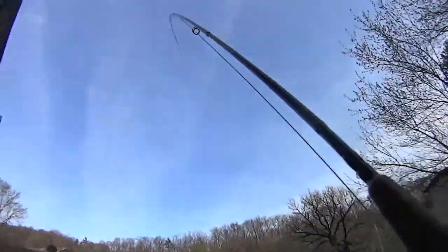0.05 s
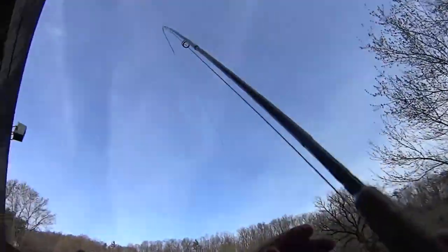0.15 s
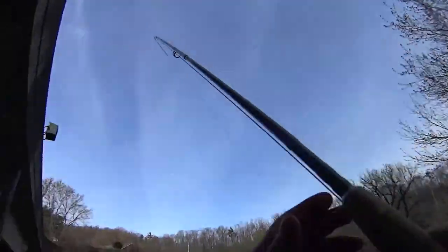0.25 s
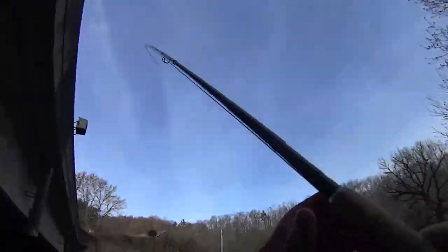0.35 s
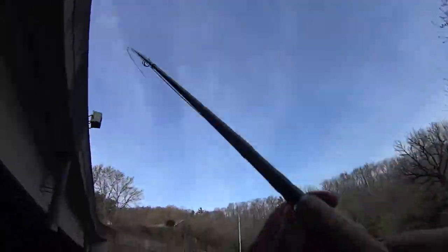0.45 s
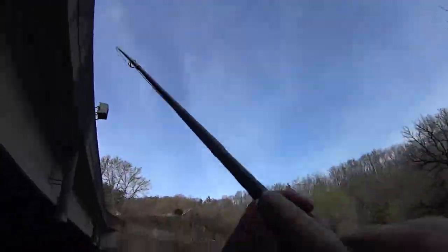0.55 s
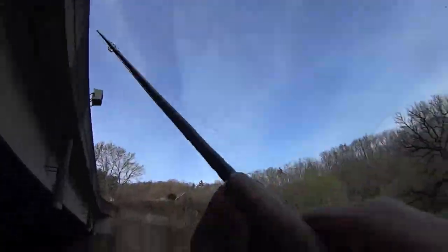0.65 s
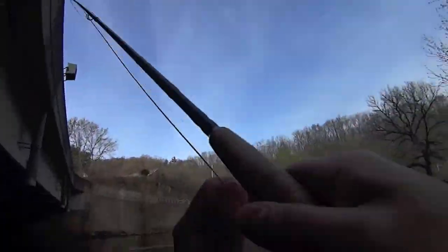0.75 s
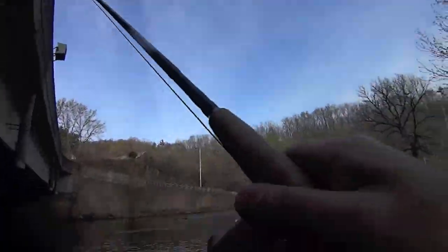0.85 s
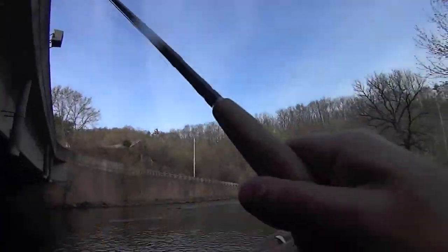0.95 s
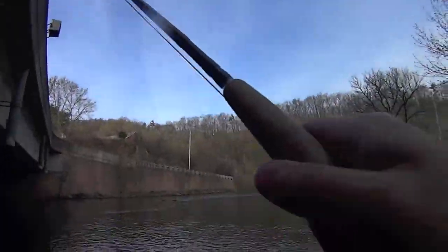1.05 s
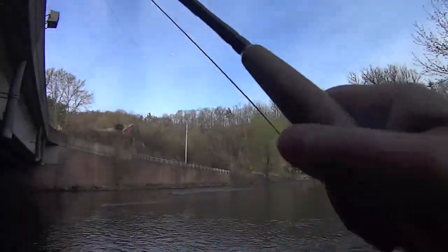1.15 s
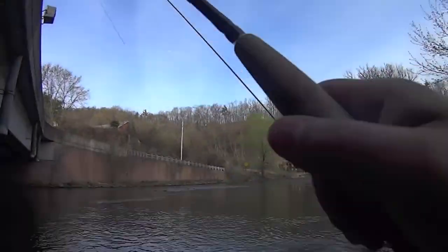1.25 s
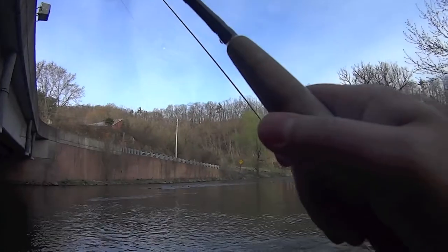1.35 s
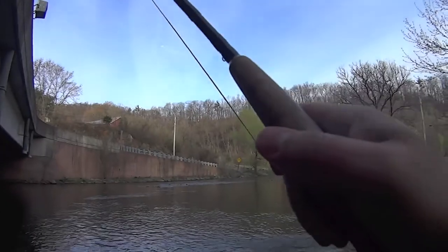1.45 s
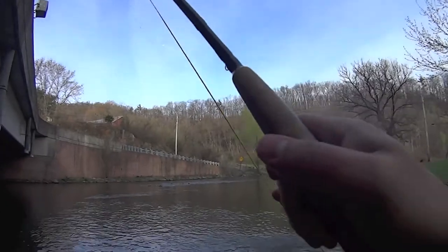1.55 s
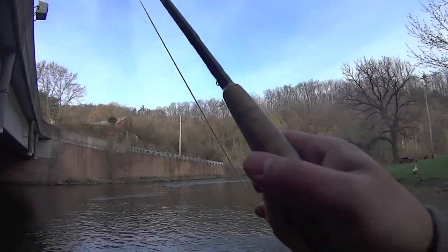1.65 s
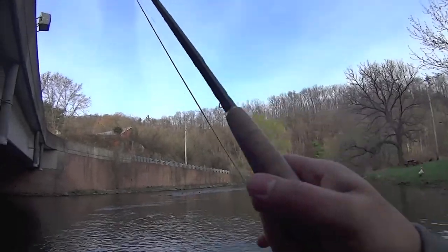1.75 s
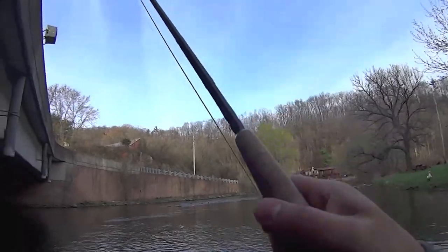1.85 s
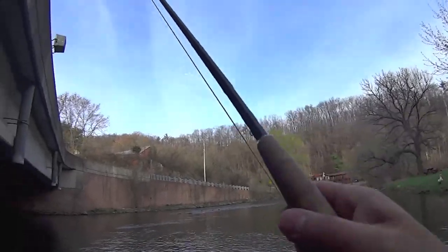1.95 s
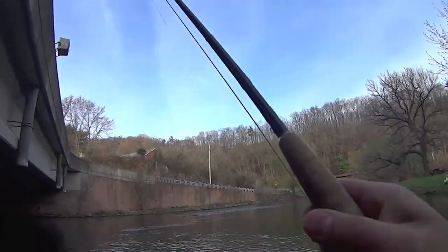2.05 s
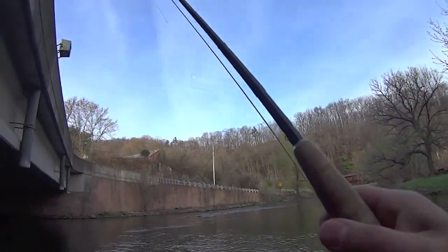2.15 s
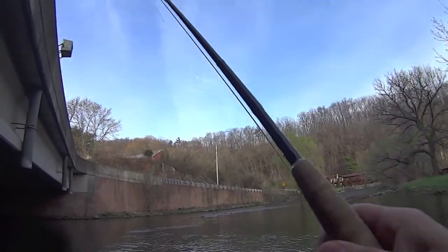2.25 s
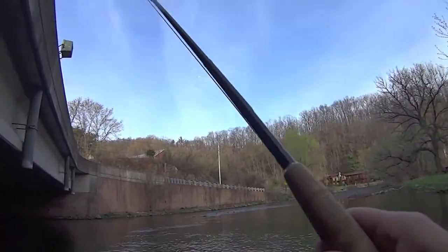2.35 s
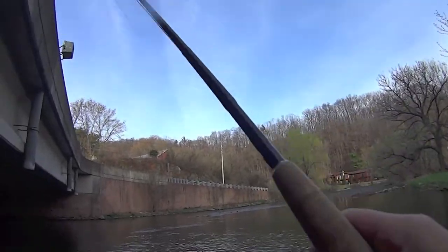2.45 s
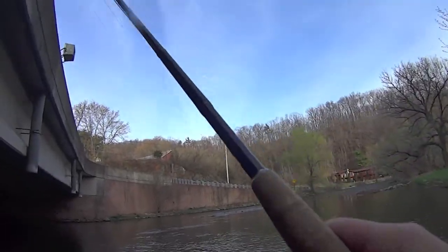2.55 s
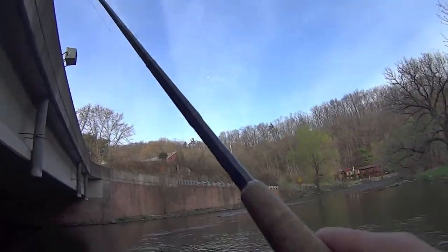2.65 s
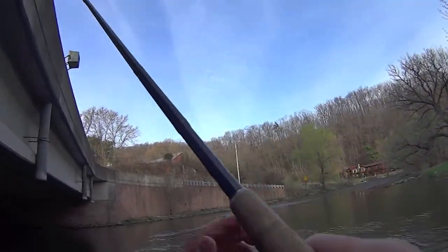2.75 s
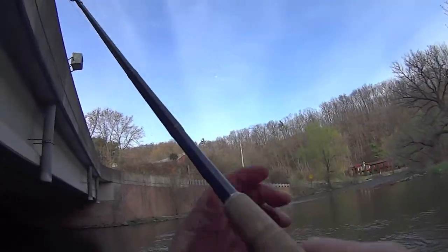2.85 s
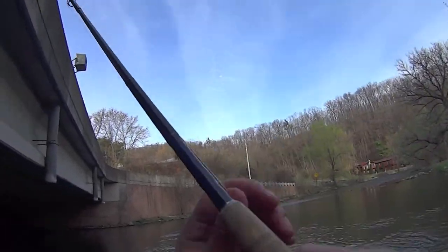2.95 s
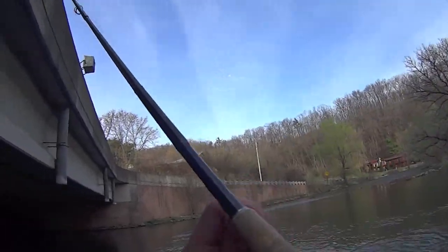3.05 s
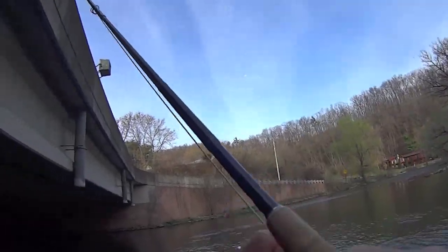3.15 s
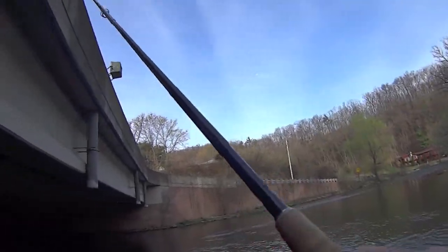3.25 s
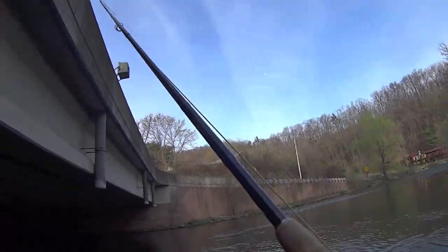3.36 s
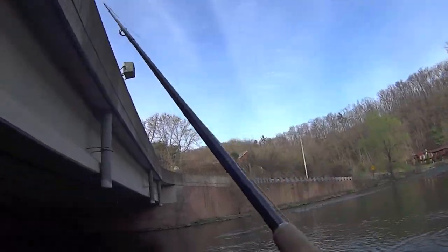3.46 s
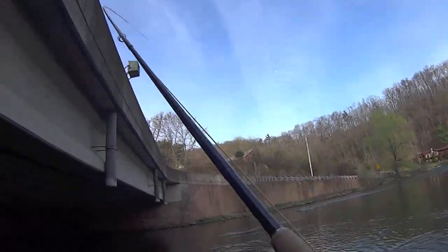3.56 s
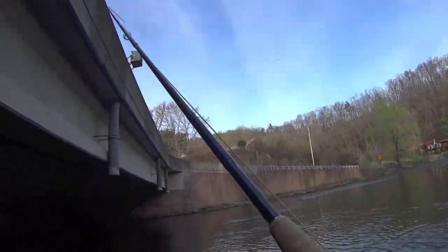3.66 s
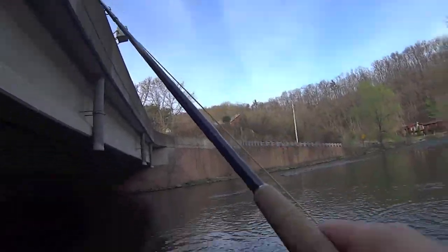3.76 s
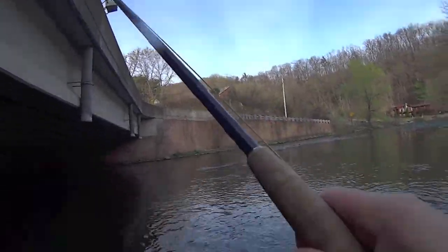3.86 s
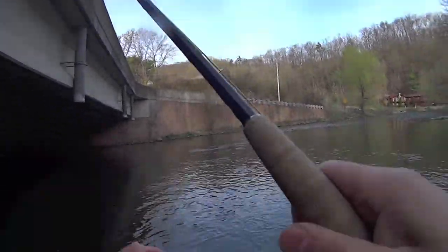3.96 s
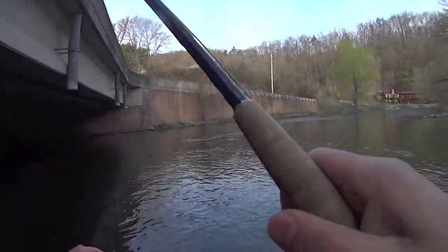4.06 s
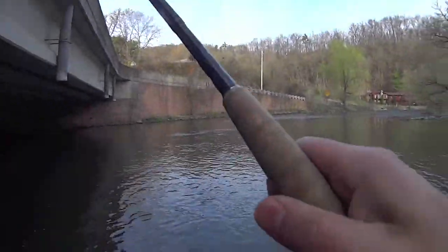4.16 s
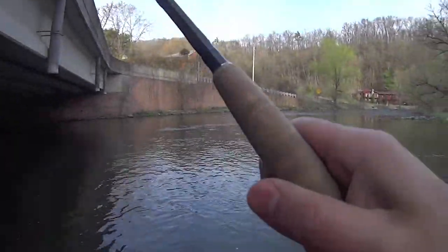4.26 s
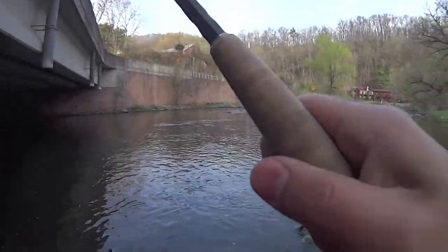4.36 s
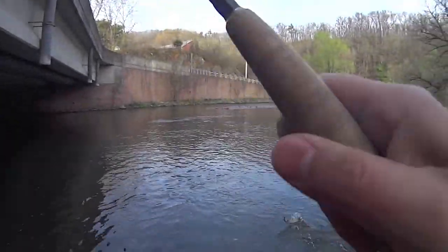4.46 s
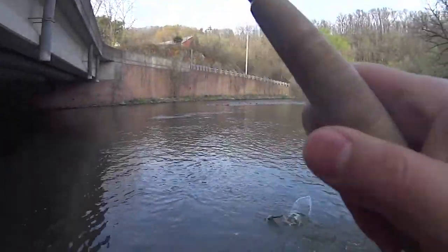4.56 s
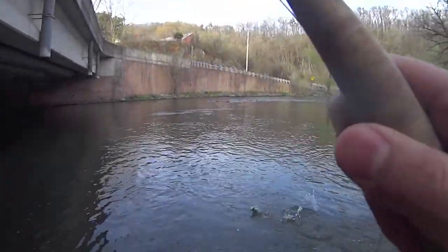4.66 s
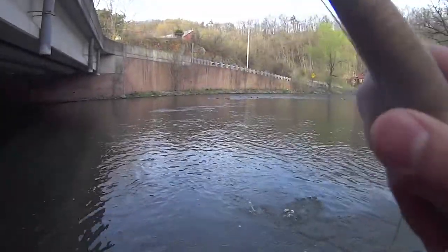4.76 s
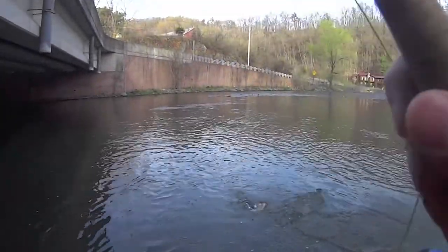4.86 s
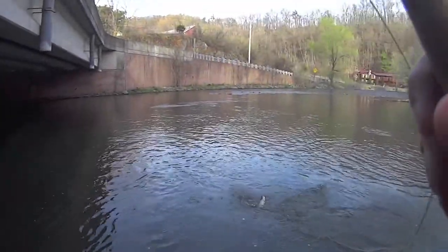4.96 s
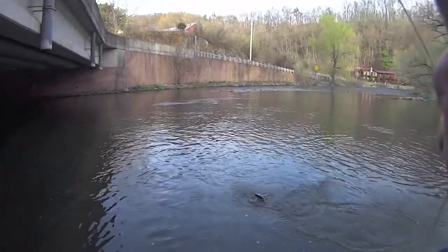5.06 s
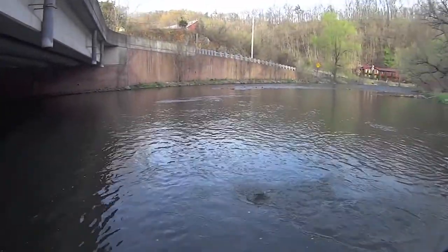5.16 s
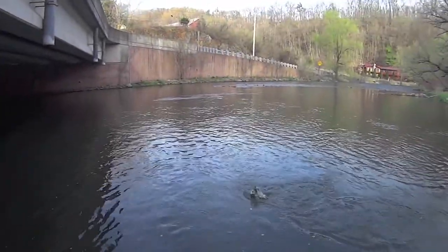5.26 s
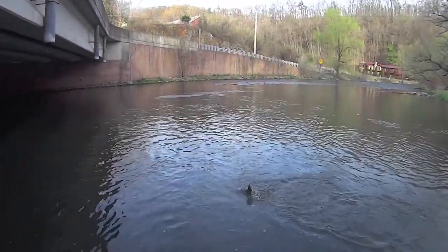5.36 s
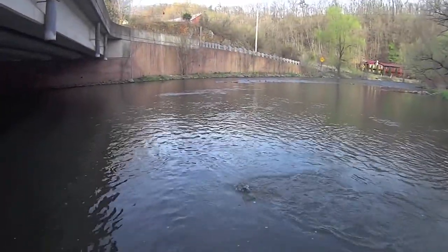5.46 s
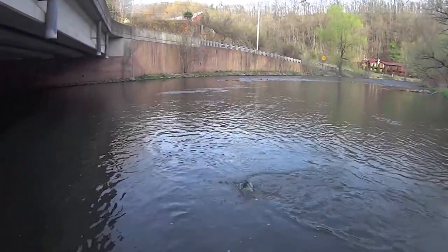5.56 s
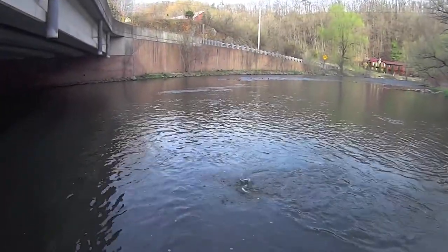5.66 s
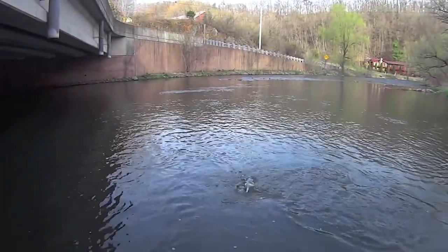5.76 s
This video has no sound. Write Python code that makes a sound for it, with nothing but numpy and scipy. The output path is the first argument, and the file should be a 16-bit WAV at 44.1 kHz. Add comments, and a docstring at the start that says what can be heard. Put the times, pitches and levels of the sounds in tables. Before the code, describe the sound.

Wet line rasps, buzzes and snaps on a fishing rod; later a fish thrashes with bright splashes and drips, over soft river wash and birdsong.

```python
"""An angler plays a hooked fish: wet line rasps as crackling noise bands, zips as narrow noise that swells
and climbs in pitch, snaps free in short bursts, and the tackle ticks and knocks.
The fish slaps and splashes with noise bursts and throws grainy spray, bubbles and pinging drops.
Swallows chirp in paired sine sweeps and a bridge throws back a faint echo, over a steady river wash.
A sleeve rubs, a breeze buffets, and the ringing camera case colours the noises and the finest drops."""
import sys
import numpy as np
from scipy import signal
from scipy.fft import rfft, irfft
from scipy.io import wavfile
from scipy.ndimage import uniform_filter1d

SR = 44100
rng = np.random.default_rng(int(sys.argv[2]) if len(sys.argv) > 2 else 0)


def wrap_up_sound(samples):
    """Save the sound to the file named by the first command line argument, as 16-bit audio."""
    columns = np.atleast_2d(samples).T
    # keep every value between -1 and 1, then stretch to whole-number steps
    tamed = np.clip(columns, -1, 1)
    steps = np.round(tamed * 32767).astype(np.int16)
    wavfile.write(sys.argv[1], SR, steps)


N = 255780
TIME = np.arange(N) / SR

# Levels below are set before the stereo lean and the band limit.
# pulls of line over the fingers: start_s, length_s, body_db, treble_db, crackle (0-1)
LINE_PULLS = [(0, 0.093, -52.5, -61.5, 0.04), (.53, 0.2, -51, -53, 0.9), (.715, 0.27, -46, -49.5, 0.53),
              (1.0, 0.46, -49.5, -55, 0.43), (1.505, 0.3, -48.5, -55, 0.42), (1.81, 0.4, -46, -49.5, 0.1),
              (2.71, 0.066, -54, -57.5, 0.4), (3.17, 0.18, -46.5, -52.5, 0.25),
              (3.38, 0.075, -47, -56.5, 0.4), (3.8, 0.18, -51, -58.5, 0.5), (3.955, 0.15, -44.5, -56, 0.35),
              (4.11, 0.27, -51.5, -59, 0.64)]
PULL_ATTACK_S, PULL_RELEASE_S = 0.016, 0.031
# surges of fast line, overlapping within a run: start_s, length_s, full_speed_db, full_speed_hz,
# guide_db (the guide's ring relative to the buzz)
LINE_SURGES = [(1.65, 0.56, -50.5, 4310, -5.5), (1.967, 0.17, -47.5, 4740, -7),
               (2.125, 0.085, -44.5, 4380, -21), (3.104, 0.208, -42, 2900, -21),
               (3.316, 0.16, -49, 2770, -24)]
# a surge gathers speed for this share of its length; level and pitch climb with it, then it dies quickly
SURGE_UP_SHARE, SURGE_RANGE_DB, SURGE_PITCH_RISE, SURGE_RELEASE_S = 0.65, 10.5, 0.028, 0.015
GUIDE_HZ, GUIDE_HALF_WIDTH_HZ, ZIP_HALF_WIDTH_HZ = 8210, 650, 660
# short sharp ticks; the late ones at 5.2384, 5.6068 and 5.6106 s are splashes of the fish:
# time_s, body_db, treble_db
SHARP_TICKS = [(0.2658, -42, -54), (0.552, -42.5, -66), (0.612, -47, -42), (0.7159, -43, -40),
               (0.7968, -42, -45), (0.832, -44, -45), (0.9555, -53, -53), (1.0245, -42, -45.5),
               (1.163, -59, -47.5), (1.5926, -40.5, -56), (3.7235, -44, -53.5), (5.1086, -47, -52),
               (5.2384, -49, -39), (5.4516, -53, -41), (5.4623, -36.5, -29.5), (5.6068, -40.5, -42.5),
               (5.6106, -45, -47)]
# dry, bright snaps of the line flicking free: time_s, body_db, treble_db
LINE_SNAPS = [(0.645, -62, -46.5), (1.0304, -50, -41.5), (1.4436, -60, -42.5), (2.6047, -52, -49),
              (2.6205, -51, -47), (2.8299, -43, -40.5)]
# short ringing knocks of the rod and reel, and one (0.977 s) on the camera case: start_s, level_db, pitch_hz,
# t60_s
KNOCKS = [(.265, -23, 2380, 0.01), (0.552, -38.5, 920, 0.026), (0.716, -24, 5050, 0.013),
          (.977, -34.5, 1215, 0.048), (1.301, -36.5, 5100, 0.068), (1.59, -27, 2940, .01),
          (5.452, -17, 5100, 0.013), (5.4627, -19, 5000, 0.012)]
# each knock rings a close, beating pair of modes, this share above and below its pitch
KNOCK_SPLIT = 0.018

# thrashes of the fish, each throwing spray: start_s, length_s, body_db, treble_db
FISH_THRASHES = [(4.14, 0.11, -47.5, -58.5), (4.33, 0.059, -51.5, -53.5), (4.44, 0.091, -49.5, -49.5),
                 (4.55, 0.26, -46, -49.5), (4.815, 0.052, -50, -53), (5.211, 0.014, -45.5, -59),
                 (5.24, 0.048, -52.5, -53), (5.322, 0.026, -47.5, -51.5), (5.395, 0.057, -47, -49.5),
                 (5.49, 0.064, -50, -53), (5.6, 0.024, -47.5, -50), (5.718, 0.056, -47.5, -52)]
THRASH_ATTACK_S, THRASH_RELEASE_S = 0.0054, 0.014
# thrown drops keep falling back after each thrash
DRIP_RELEASE_S = 0.23
# slaps of the tail and of falling water: time_s, body_db, treble_db
WATER_SLAPS = [(4.1456, -44, -60), (4.186, -42.5, -47.5), (4.4203, -42, -42), (4.4836, -60, -46.5),
               (4.5076, -30.5, -34.5), (4.628, -53, -45), (4.646, -49, -47.5), (4.719, -55, -50),
               (4.771, -52, -44.5), (4.7991, -48, -52), (4.8227, -44.5, -44.5), (4.8866, -68, -49),
               (5.3255, -49, -46), (5.4113, -49, -41.5), (5.4267, -46, -51), (5.7676, -48, -44.5),
               (5.7715, -51, -46)]
# single bubbles and pinging drops, low and high: start_s, level_db, start_pitch_hz
BUBBLES_AND_DROPS = [(4.155, -45, 780), (4.176, -41, 857), (4.228, -32, 2430), (4.5063, -15.5, 2550),
                     (4.5083, -22.5, 1250), (4.524, -36, 1200), (4.565, -37, 1280), (4.622, -46.5, 275),
                     (4.628, -52, 487), (4.629, -34, 1140), (4.646, -27, 4920), (4.656, -25, 3060),
                     (4.6635, -30, 4900), (4.665, -29, 2800), (4.665, -24.5, 1257), (4.677, -31, 882),
                     (4.695, -32, 2540), (4.728, -29.5, 1950), (4.742, -31, 7050), (4.744, -35, 1590),
                     (4.782, -35, 1380), (4.837, -31, 2090), (4.856, -34, 3920), (4.871, -29.5, 6440),
                     (5.214, -30, 2600), (5.246, -27, 2520), (5.251, -28, 3000), (5.258, -27, 3140),
                     (5.279, -30, 2730), (5.337, -33, 2060), (5.41, -32, 1400), (5.419, -29.5, 1990),
                     (5.426, -25, 2000), (5.538, -30, 2030), (5.553, -31.5, 2580), (5.595, -32, 2670),
                     (5.627, -29, 4900), (5.636, -34, 2030), (5.766, -24.5, 2390)]
# ring time (t60) at 1 kHz; higher ones die sooner by this power of their pitch
BUBBLE_RING_S, BUBBLE_DAMPING = 0.031, 0.78

# a swallow sings with both sides of its syrinx, one holding a high note, one arching below:
# time_s (from the chirp's start), upper_hz, lower_hz, upper_db, lower_db (added to the chirp's levels)
SWALLOW_SHAPE = [(0, 3907, 3250, -25, -1), (.012, 4200, 3830, -3.5, -0.5), (.028, 4250, 3980, 3, 1),
                 (.043, 4185, 3850, 4, -0.5), (.056, 4200, 3560, -17, 3), (.076, 4000, 3260, -9, 0.5),
                 (.088, 4000, 3130, -37, 4.5)]
# swallow chirps: start_s, lower_db, upper_db, pitch_ratio
SWALLOW_CHIRPS = [(0.45, -54.5, -53, 1), (1.988, -51, -50, 1.0), (2.931, -59.5, -57.5, 1.01),
                  (3.976, -50.5, -46.5, 1.025), (4.036, -52.5, -55, 1.02), (4.653, -55, -45, 1.01),
                  (5.386, -50.5, -55, 1.06)]
# short notes of farther birds: start_s, length_s, level_db, first_hz, last_hz
FAR_NOTES = [(0.408, 0.057, -57, 4560, 5100), (2.913, 0.032, -60, 4700, 5500),
             (3.045, 0.064, -55.5, 3170, 3310), (3.515, 0.039, -50, 2164, 2195),
             (3.586, 0.041, -45.5, 2400, 2910), (3.606, 0.043, -53.5, 3320, 3250),
             (3.72, 0.061, -52, 3290, 2960), (3.795, 0.042, -56, 2770, 2480),
             (3.822, 0.085, -58.5, 3320, 3440), (3.89, 0.06, -46, 2540, 2590),
             (4.005, 0.061, -45.5, 2570, 2534), (4.272, 0.056, -52.5, 3250, 2980),
             (5.365, 0.023, -49.5, 4800, 5330), (5.629, 0.05, -52, 3770, 4020)]

# rubs of a sleeve by the camera: start_s, length_s, level_db
SLEEVE_RUBS = [(0, 0.32, -58), (0.572, 0.27, -51.5), (0.887, 0.19, -58), (2.974, 0.061, -60)]
RUB_ATTACK_S, RUB_RELEASE_S = 0.054, 0.066
# strength of the breeze on the microphone: time_s, level_db
BREEZE_LEVEL = [(0, -55.5), (.7, -61.5), (1.35, -72), (2.0, -62.5), (3.3, -67.5), (3.8, -63), (4.2, -66.5),
                (5.8, -84)]

# relative spectrum of line friction: frequency_hz, density_db
FRICTION_SPECTRUM = [(400, -9), (1000, -12.5), (2000, -0.6), (3500, 2.5), (6000, 1.5), (11000, -14)]
# relative spectrum of a sharp tick: frequency_hz, density_db
TICK_SPECTRUM = [(400, -21), (1000, -13.5), (2200, 4), (3500, -5.5), (5200, 5), (7000, -2), (11000, -6)]
# relative spectrum of a line snap: frequency_hz, density_db
SNAP_SPECTRUM = [(1000, -24), (3500, -2), (11000, 2)]
# relative spectrum of spray: frequency_hz, density_db
SPRAY_SPECTRUM = [(250, -14), (700, -8.5), (1300, -4.5), (2200, -1.5), (6000, 5.5), (11000, -8)]
# relative spectrum of a water slap: frequency_hz, density_db
SLAP_SPECTRUM = [(450, -31), (1300, 1), (6000, 1.5), (11000, -13.5)]
# relative spectrum of the sleeve: frequency_hz, density_db
SLEEVE_SPECTRUM = [(30, -9), (70, -4), (130, -5), (300, -1), (500, -12.5), (1000, -14), (3000, -74)]
# relative spectrum of the breeze: frequency_hz, density_db
WIND_SPECTRUM = [(20, -2.5), (110, -9), (200, -22), (600, -54.5)]
# relative spectrum of the river: frequency_hz, density_db
RIVER_SPECTRUM = [(40, -6), (120, -12), (300, -7.5), (2000, -10.5), (3500, -11), (6000, -17.5),
                  (11000, -28.5)]
FLAT_SPECTRUM = [(0, 0)]

# hollow resonances of the camera case: frequency_hz, half_width_hz, boost_db
CASE_RESONANCES = [(939, 50, 3.5), (1210, 132, 7), (1645, 290, 5.5), (2160, 262, 10), (2596, 390, 7),
                   (4930, 540, 5.5), (5220, 82, 3.5), (6070, 80, 3.5), (6970, 480, 4), (8164, 180, 7),
                   (8740, 590, 6.5), (10460, 630, 8)]
# left-right likeness of near sources: frequency_hz, likeness (-1 to 1)
NEAR_STEREO = [(130, 0.44), (570, 0.037), (1200, 1), (2200, 0.27), (5400, 1), (11000, 0.37)]
# left-right likeness of the open air: frequency_hz, likeness (-1 to 1)
AIR_STEREO = [(60, 0.97), (130, 0.83), (270, -0.046), (570, -0.26), (1200, -0.086), (2500, 0.47)]
# stereo balance, scaled by each layer's amount: frequency_hz, left_minus_right_db
STEREO_LEAN = [(620, 0.5), (1120, -5), (2000, -4.5), (3600, -3), (6400, -1), (11000, -1.5)]
SPLIT_HZ = 3300  # between body and treble
EDGE_HZ = 11150  # top of the camera's band


def tackle():
    """The line sticks and slips, zips, snaps free and knocks the rod; the camera case is knocked once; the
    sharp ticks end in fish splashes."""
    pull = movements(LINE_PULLS, PULL_ATTACK_S, PULL_RELEASE_S)
    crackle = latest(LINE_PULLS)[-1]
    rod = grains(pull, crackle, FRICTION_SPECTRUM, per_s=490, spread_db=6.0, grain_s=0.00057, wide=0.44)
    rod += zipping()
    rod += hits(SHARP_TICKS, TICK_SPECTRUM, rise_s=.0005, decay_s=.0011, tail_db=-19, tail_s=.005)
    rod += hits(LINE_SNAPS, SNAP_SPECTRUM, rise_s=.0003, decay_s=.0005, tail_db=-30, tail_s=.003)
    for s, db, hz, t60 in KNOCKS:
        for ratio in (1 - KNOCK_SPLIT, 1 + KNOCK_SPLIT):
            add(rod, s, ring(db, ratio * hz, t60, rise=0) / 2)
    return rod


def zipping(rough_db=1.6, rough_samples=500, order=5):
    """The line's texture buzzes unevenly over a guide: a band climbing with speed, and the guide's high ring."""
    def band(hz, half_width_hz):
        """Shifts the rasp down by hz, low-passes it and shifts it back: a band-pass that can glide."""
        turn = np.exp(2j * np.pi * np.cumsum(hz * np.ones(N)) / SR)
        lowpass = signal.butter(order, half_width_hz, fs=SR, output="sos")
        return evened((turn * signal.sosfilt(lowpass, rasp / turn)).real)

    rasp, out = colour(noise_pair(NEAR_STEREO), FLAT_SPECTRUM), 0
    guide = band(GUIDE_HZ, GUIDE_HALF_WIDTH_HZ)
    for start, length, top_db, top_hz, guide_db in LINE_SURGES:
        rasp = np.roll(rasp, SR, axis=1)  # another stretch of texture for each surge's buzz
        slowness = 1 - np.clip((TIME - start) / (SURGE_UP_SHARE * length), 0, 1)
        swell = amp(top_db - SURGE_RANGE_DB * slowness)
        gain = swell * envelope(start, length, PULL_ATTACK_S, SURGE_RELEASE_S)
        buzz = band(top_hz * (1 - SURGE_PITCH_RISE * slowness), ZIP_HALF_WIDTH_HZ)
        out = out + gain * (buzz + amp(guide_db) * guide)
    roughness = evened(uniform_filter1d(rng.standard_normal(N), size=rough_samples))
    return out * amp(rough_db * roughness)


def fish(small_db=7.5, size_range_db=17.0, treble_lift_db=4.5, count=420):
    """Slaps, a soft wash of spray, single bubbles and drops, and small bubbles that follow the thrashing."""
    churn = movements(FISH_THRASHES, THRASH_ATTACK_S, THRASH_RELEASE_S)
    water = grains(churn, .92, SPRAY_SPECTRUM, per_s=220, spread_db=4.5, grain_s=0.0012, wide=0.12)
    water += hits(WATER_SLAPS, SLAP_SPECTRUM, rise_s=0.00099, decay_s=0.0013, tail_db=-22, tail_s=0.008)
    for s, db, hz in BUBBLES_AND_DROPS:
        add(water, s, bubble(db, hz))
    first_s = FISH_THRASHES[0][0]
    for when, pitch, size in rng.random((count, 3)):
        s = first_s + when * (TIME[-1] - first_s)
        db = small_db - size_range_db * size + treble_lift_db * pitch  # relative to the churn
        add(water, s, churn[0, int(s * SR)] * bubble(db, 1350 * 4.2 ** pitch))
    return water


def bubble(db, hz, rise=0.12, lowest_share=.88, order=4):
    """A bubble or pinging drop: shorter when higher, climbing in pitch, jostled by the churning water."""
    khz = hz / 1000
    sound = ring(db, hz, BUBBLE_RING_S * khz ** -BUBBLE_DAMPING, rise)
    jostle_db = 2.4 * evened(uniform_filter1d(rng.standard_normal(sound.shape[1]), size=80))
    # little sounds below its pitch
    highpass = signal.butter(order, lowest_share * hz, "high", fs=SR, output="sos")
    return signal.sosfilt(highpass, sound * amp(jostle_db))


def drips(level_db, size_range_db=24.0, low_hz=1800, high_hz=7000, ring_s=0.01, count=520):
    """Fine drops strike the surface, each with a brief ping of its own pitch."""
    falling = movements(FISH_THRASHES, THRASH_ATTACK_S, DRIP_RELEASE_S)[1]
    out = np.zeros((2, N))
    first_s = FISH_THRASHES[0][0]
    for when, pitch, size in rng.random((count, 3)):
        s = first_s + when * (TIME[-1] - first_s)
        hz = low_hz * (high_hz / low_hz) ** pitch
        ping = ring(level_db - size_range_db * size, hz, ring_s, rise=0.048)
        add(out, s, falling[int(s * SR)] * ping)
    return colour(out, FLAT_SPECTRUM)


def birds():
    """Two-voiced chirps and thin, quavering far notes, all swept sines."""
    out = np.zeros((2, N))
    t = np.arange(0, SWALLOW_SHAPE[-1][0], 1 / SR)
    upper_hz, lower_hz, upper_shape_db, lower_shape_db = follow(SWALLOW_SHAPE, t)
    for s, lower_db, upper_db, ratio in SWALLOW_CHIRPS:
        upper = evened(voice(ratio * upper_hz, quaver=.006, flutter_db=1.5))
        lower = evened(voice(ratio * lower_hz, quaver=.03, flutter_db=3))
        add(out, s, amp(upper_db + upper_shape_db) * upper + amp(lower_db + lower_shape_db) * lower)
    for s, length, db, first_hz, last_hz in FAR_NOTES:
        hz = np.linspace(first_hz, last_hz, int(length * SR))
        note = evened(voice(hz, quaver=.008, flutter_db=2.2))
        add(out, s, amp(db) * note * signal.windows.tukey(len(hz), .7))
    return out


def voice(hz, quaver, flutter_db, port_lag=0.32):
    """A bird's whistle, unsteady in pitch and strength."""
    drift, flutter = evened(uniform_filter1d(rng.standard_normal((2, len(hz))), size=130))
    return amp(flutter_db * flutter) * tone(hz * (1 + quaver * drift), port_lag)


def bridge(x, t60=0.98, delay_s=0.02):
    """A diffuse echo from the concrete overhead: delayed, decaying noise as an impulse response."""
    t = np.arange(SR) / SR
    tail = rng.standard_normal((2, len(t))) * amp(-60 * t / t60) * (t > delay_s)
    return signal.oaconvolve(x, tail / np.linalg.norm(tail[0]), axes=1)[:, :N]


def handling():
    """A sleeve rubs by the camera and light air buffets it: two low noises under moving gains."""
    rub = sum(amp(db) * envelope(s, length, RUB_ATTACK_S, RUB_RELEASE_S) for s, length, db in SLEEVE_RUBS)
    sleeve = evened(colour(noise_pair(AIR_STEREO), SLEEVE_SPECTRUM))
    wind = evened(colour(noise_pair(AIR_STEREO), WIND_SPECTRUM))
    return rub * sleeve + amp(follow(BREEZE_LEVEL)[0]) * wind


def river(level_db=-50.5):
    """The even wash of the current: steady shaped noise."""
    return amp(level_db) * evened(colour(noise_pair(AIR_STEREO), RIVER_SPECTRUM))


def grains(gains, share, spectrum, per_s, spread_db, grain_s, wide, count=7):
    """A smooth hiss blended with tiny bursts of very unequal size; some in one pitch band, some in all."""
    share, wide = np.clip(share, 0, 1), np.clip(wide, 0, 1)
    pole = np.exp(-2 / (grain_s * SR))

    def bursts():
        """Power over time of random bursts, with a mean of 1."""
        size = amp(spread_db * np.minimum(rng.exponential(1, N), 3.5)) * (rng.random(N) < per_s / SR)
        power = signal.lfilter([1], np.poly([pole, pole]), size ** 2)
        return abs(power) / power.mean()

    shared, x = bursts(), 0
    # overlapping bands, evenly spaced in log frequency
    log_hz = np.log(np.fft.rfftfreq(N, 1 / SR) + 1)
    place = np.interp(log_hz, np.log([800, 9000]), [0, count - 1])
    noise = rfft(noise_pair(NEAR_STEREO))
    for k in range(count):
        band = irfft(noise * np.maximum(1 - abs(place - k), 0), N)
        burst_power = wide * shared + (1 - wide) * bursts()
        x = x + band * np.sqrt(1 - share + share * burst_power)
    body, treble = bands(colour(x, spectrum))
    return gains[0] * evened(body) + gains[1] * evened(treble)


def hits(rows, spectrum, rise_s, decay_s, tail_db, tail_s, count=2048):
    """Sharp noise bursts with a faint tail; each level is the rms of the burst's energy spread over 8 ms."""
    out, t = np.zeros((2, N)), np.arange(count) / SR
    window = .008 * SR
    decay = np.exp(-t / decay_s) + amp(tail_db) * np.exp(-t / tail_s)
    shape = (1 - np.exp(-(t / rise_s) ** 2)) * decay
    for s, *levels_db in rows:
        burst = shape * noise_pair(NEAR_STEREO, count)
        for db, band in zip(levels_db, bands(colour(burst, spectrum))):
            add(out, s - rise_s, amp(db) * evened(band) * np.sqrt(window / count))
    return out


def ring(db, hz, t60, rise):
    """A damped tone whose pitch climbs by the share rise as it dies."""
    t = np.arange(0, t60, 1 / SR)
    onset = 1 - np.exp(-(t / 0.00067) ** 2)
    return amp(db - 60 * t / t60) * onset * tone(hz * (1 + rise * t / t60), port_lag=0.4)


def tone(hz, port_lag):
    """A sine on a pitch curve, reaching the left port port_lag radians late."""
    return np.sin(2 * np.pi * np.cumsum(hz) / SR - np.array([[port_lag], [0]]))


def envelope(start, length, attack_s, release_s):
    """Attack, hold and release of one movement."""
    attack = np.clip((TIME - start) / attack_s, 0, 1)
    return attack * np.exp(-np.maximum(TIME - start - length, 0) / release_s)


def movements(rows, attack_s, release_s):
    """Body and treble gains over time of a series of movements, summed in power."""
    power = 0
    for s, length, body_db, treble_db, *_ in rows:
        gain = amp([[body_db], [treble_db]]) * envelope(s, length, attack_s, release_s)
        power = power + gain ** 2
    return np.sqrt(power)


def latest(rows):
    """At every moment, the columns of the event that began last."""
    table = np.array(rows)
    return table[np.maximum(np.searchsorted(table[:, 0], TIME, "right") - 1, 0)].T


def colour(x, spectrum, size=4096):
    """Minimum-phase filter: a source's spectrum, ringing in the camera case."""
    hz = np.fft.rfftfreq(size, 1 / SR)
    db = read(spectrum, hz)
    for f, half_width, boost in CASE_RESONANCES:
        db = db + boost * np.exp(-((hz - f) / half_width) ** 2)
    # folding the cepstrum makes the filter causal
    cepstrum = irfft(np.log(amp(db)))[:size // 2]
    cepstrum[1:] *= 2
    response = irfft(np.exp(rfft(cepstrum, size)))
    return signal.oaconvolve(x, response[None], axes=1)[:, :x.shape[1]]


def noise_pair(likeness, count=N):
    """White noise at two ports, alike by the given amount at each frequency."""
    a, b = rfft(rng.standard_normal((2, count)))
    same = np.clip(read(likeness, np.fft.rfftfreq(count, 1 / SR)), -1, 1)
    return irfft([same * a + np.sqrt(1 - same ** 2) * b, a], count)


def bands(x, order=5):
    """The body and the treble of a sound, either side of the split."""
    return [signal.sosfilt(signal.butter(order, SPLIT_HZ, side, fs=SR, output="sos"), x)
            for side in ("low", "high")]


def lean(x, amount):
    """Tips the stereo balance by frequency, mostly to the right, keeping the power of the two gains."""
    lean_db = amount * read(STEREO_LEAN, np.fft.rfftfreq(N, 1 / SR))
    sides = amp([lean_db / 2, -lean_db / 2])
    return irfft(rfft(x) * sides / np.sqrt(np.mean(sides ** 2, axis=0)), N)


def amp(db):
    """Decibels to gain."""
    return 10 ** (np.asarray(db) / 20)


def evened(x):
    """Scales to rms 1."""
    return x / np.sqrt(np.mean(x ** 2) + 1e-20)


def read(points, hz):
    """A curve's value at hz, on a log-frequency axis."""
    f, value = np.transpose(points)
    return np.interp(np.log(hz + 1), np.log(f + 1), value)


def follow(rows, t=TIME):
    """The columns of a curve at the times t."""
    s, *columns = np.transpose(rows)
    return [np.interp(t, s, c) for c in columns]


def add(mix, s, sound):
    """Adds a stereo sound to the mix at time s."""
    part = mix[:, round(s * SR):][:, :sound.shape[1]]
    part += sound[:, :part.shape[1]]


def scene():
    """Rod, fish and birds lean right; river and handling lean less, and the bridge echoes fish and birds."""
    water = fish() + drips(level_db=7.5)  # drip level relative to the falling water
    song = birds()
    echo = bridge(amp(-10.0) * water + amp(-5.5) * song)
    near = tackle() + water + song + echo
    return lean(near, amount=1.25) + lean(river() + handling(), amount=0.68)


def record(dry):
    """The camera's band limit: a steep low-pass."""
    lowpass = signal.firwin(511, EDGE_HZ, window=("kaiser", 8), fs=SR)
    return signal.oaconvolve(dry, lowpass[None], "same")


dry = scene()
out = record(dry)
wrap_up_sound(out)
```